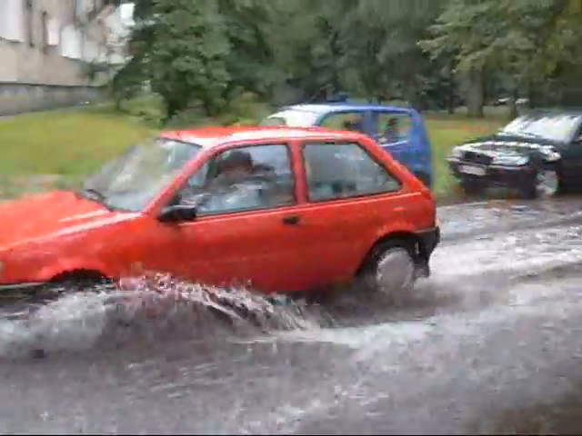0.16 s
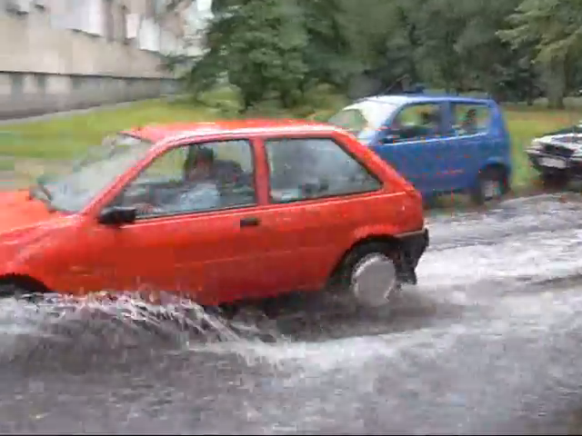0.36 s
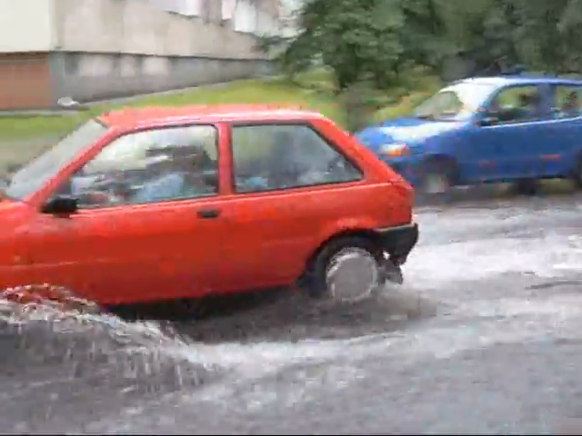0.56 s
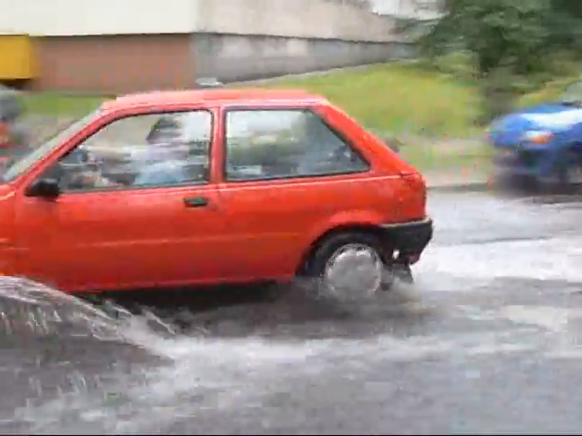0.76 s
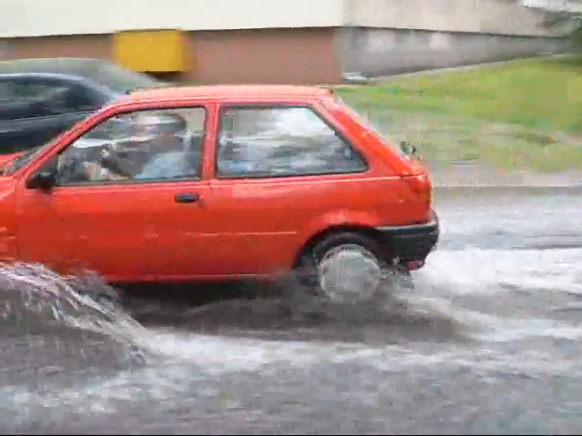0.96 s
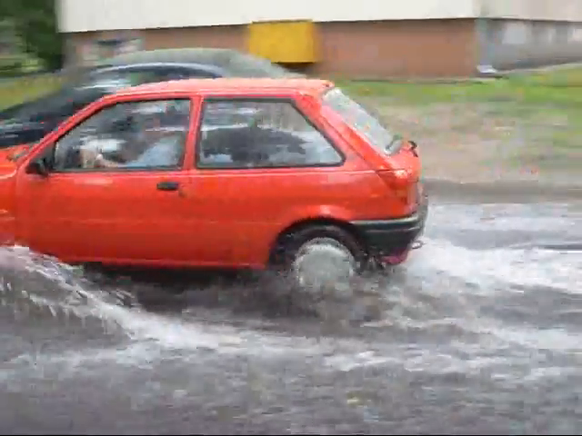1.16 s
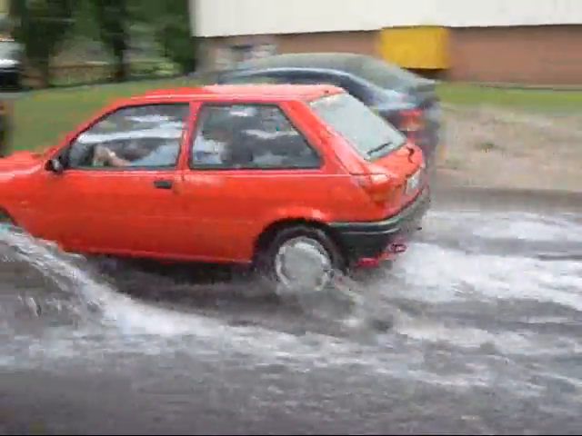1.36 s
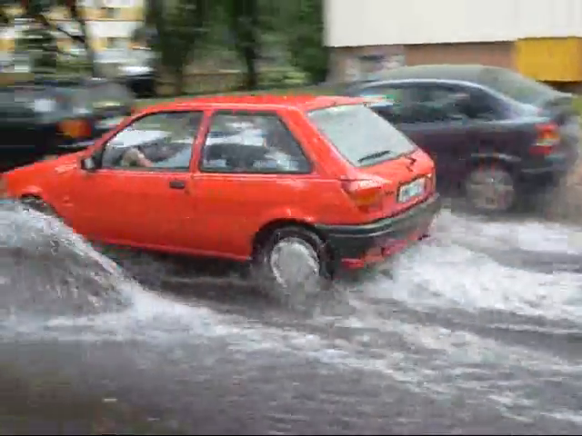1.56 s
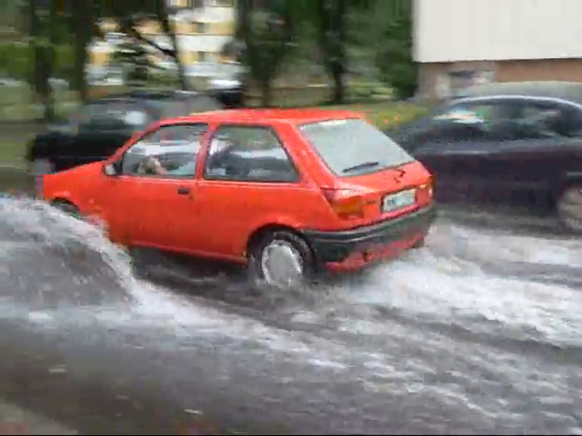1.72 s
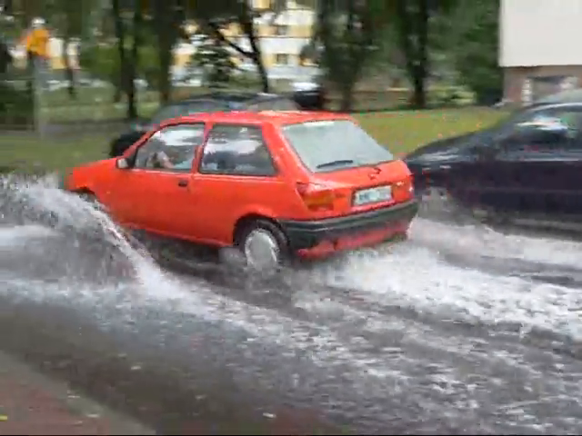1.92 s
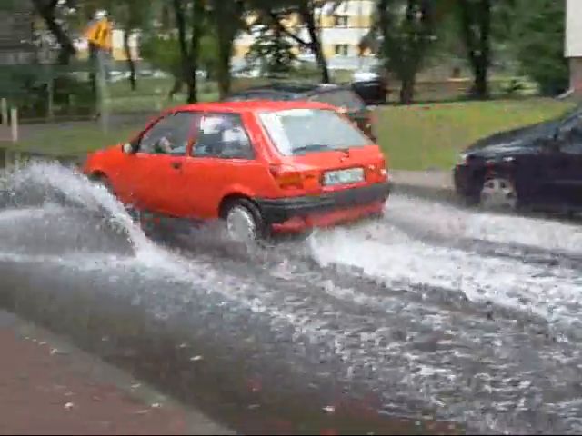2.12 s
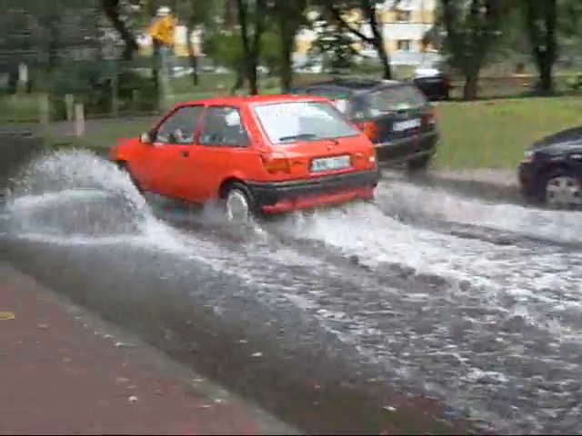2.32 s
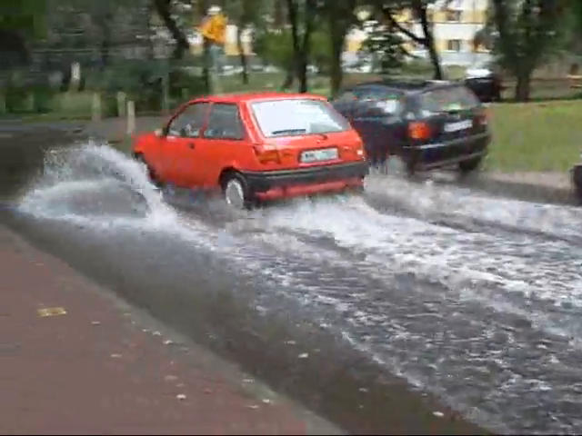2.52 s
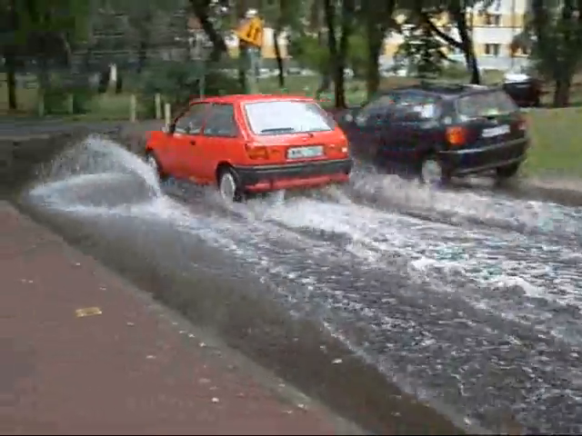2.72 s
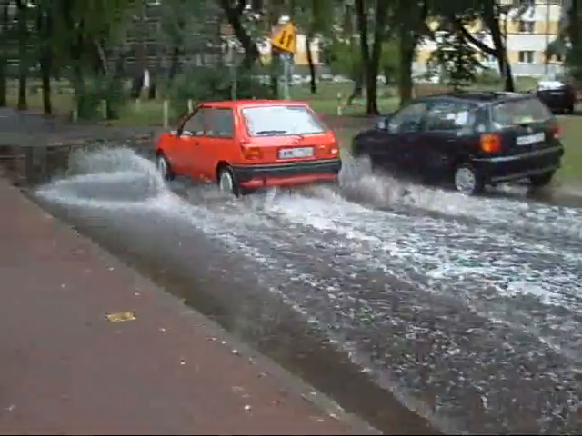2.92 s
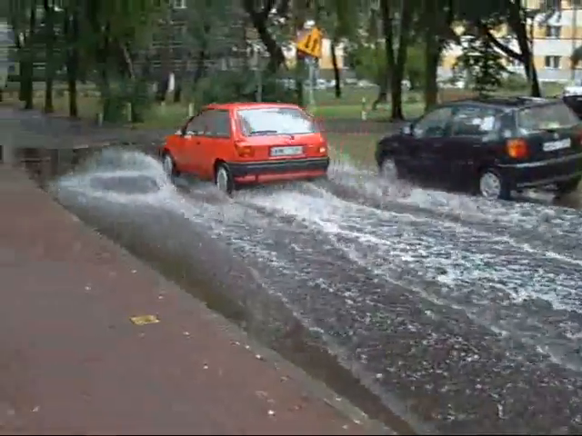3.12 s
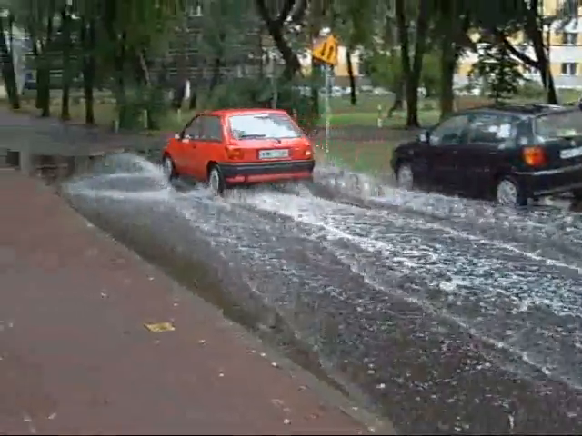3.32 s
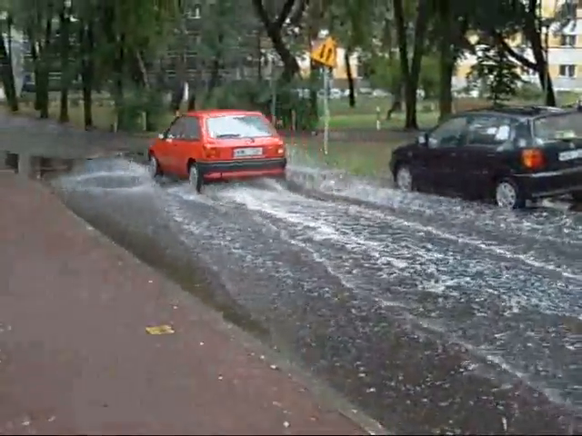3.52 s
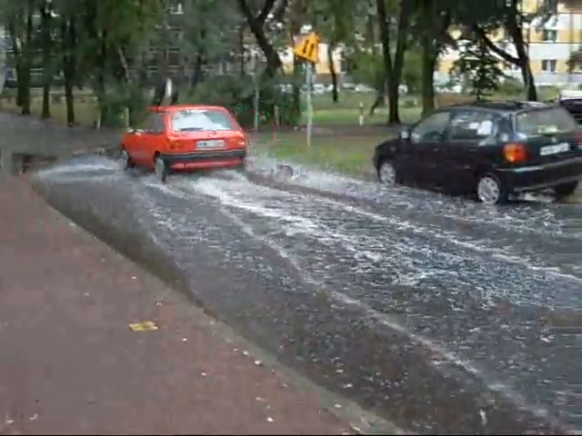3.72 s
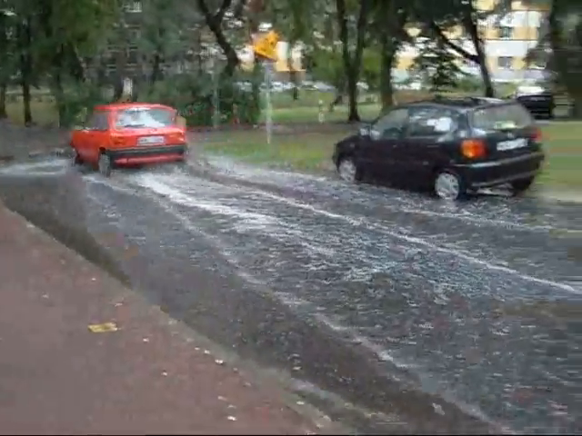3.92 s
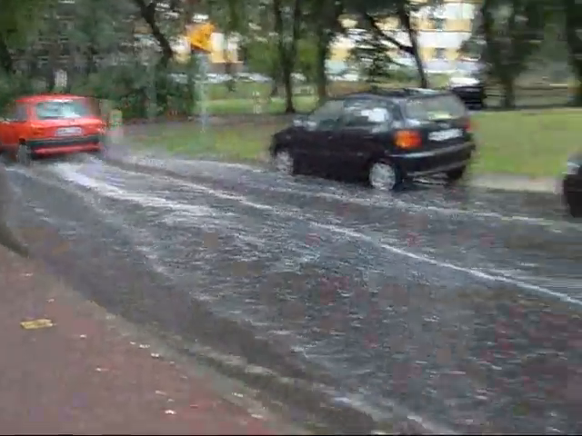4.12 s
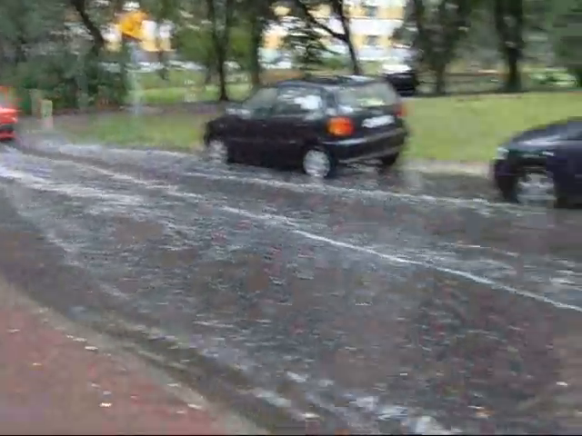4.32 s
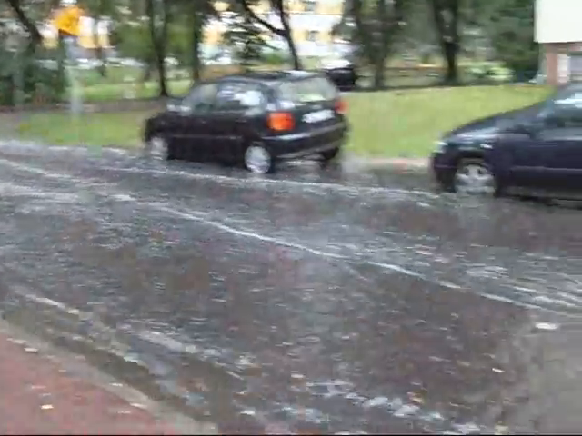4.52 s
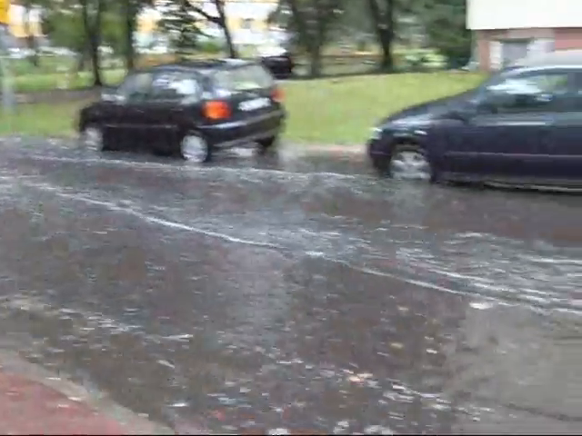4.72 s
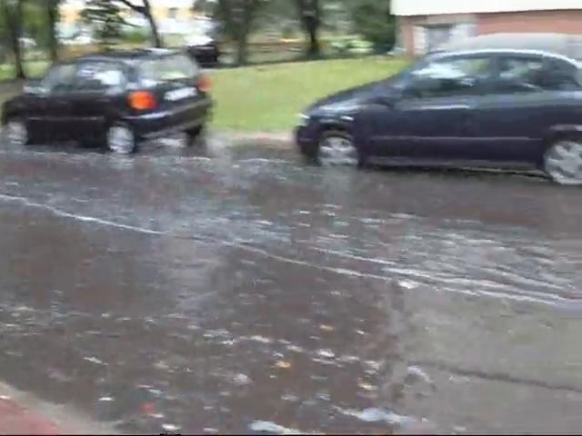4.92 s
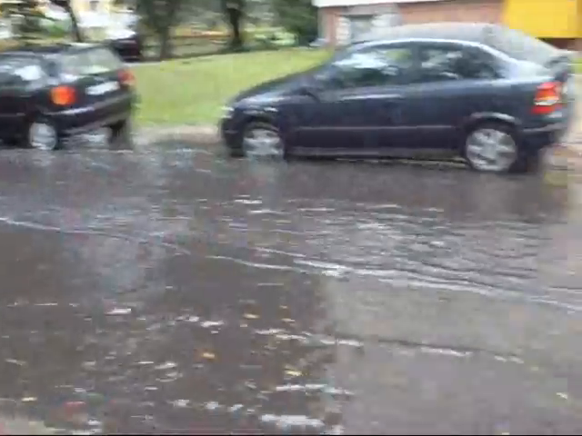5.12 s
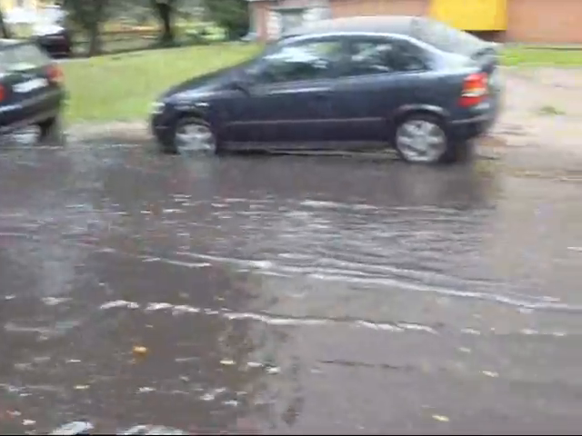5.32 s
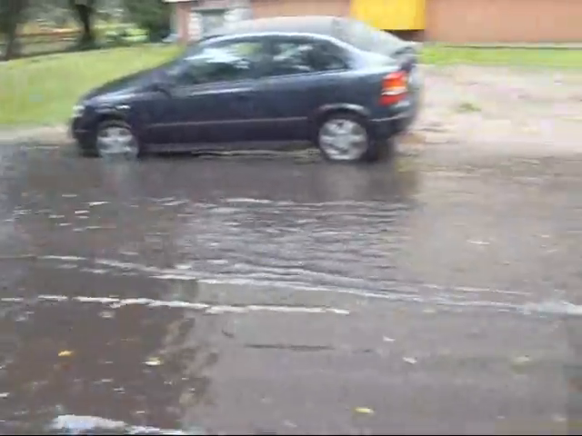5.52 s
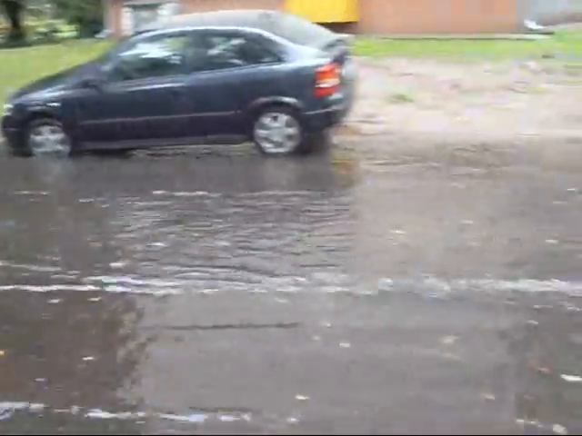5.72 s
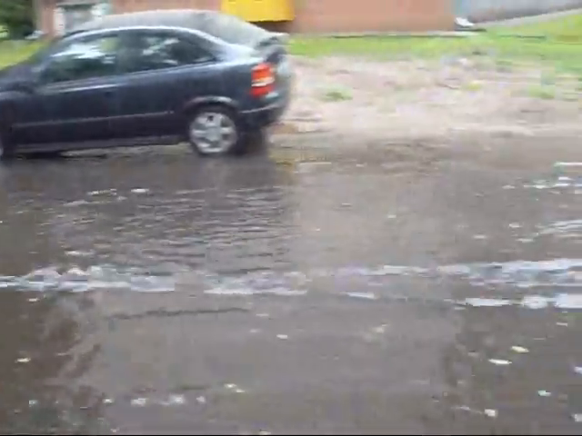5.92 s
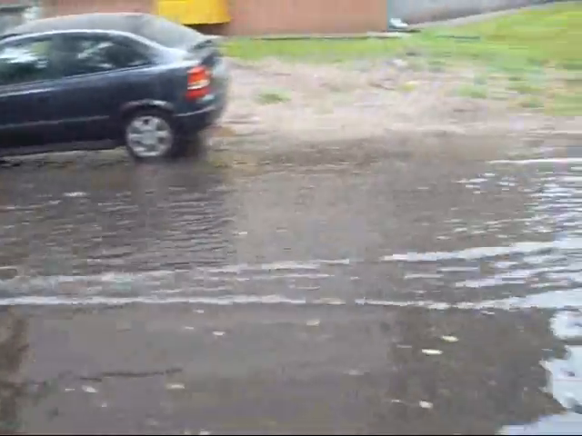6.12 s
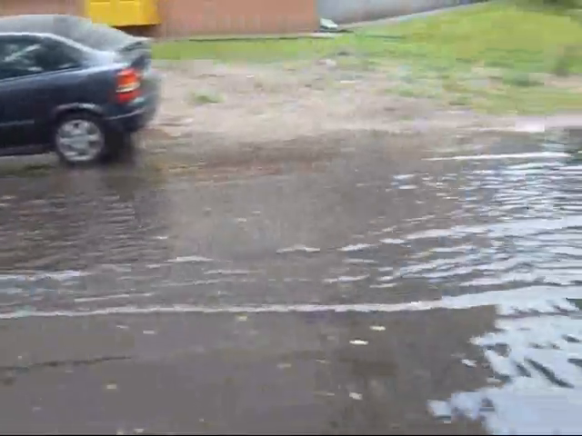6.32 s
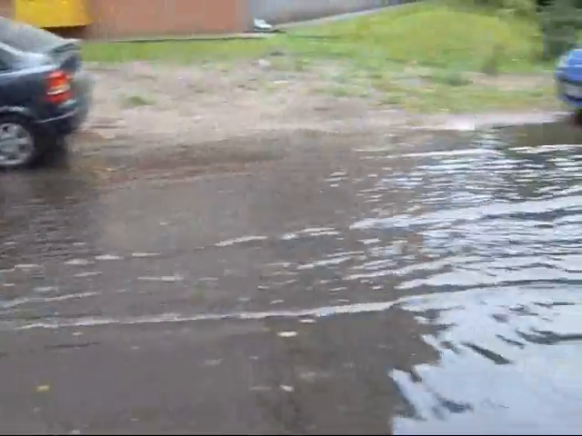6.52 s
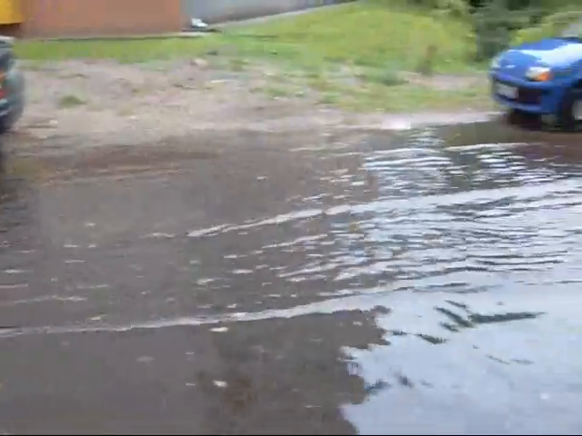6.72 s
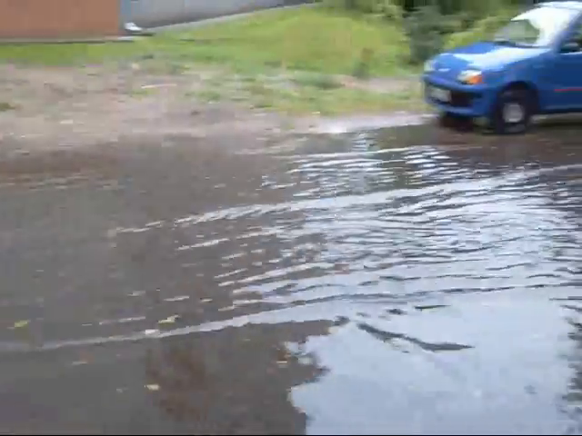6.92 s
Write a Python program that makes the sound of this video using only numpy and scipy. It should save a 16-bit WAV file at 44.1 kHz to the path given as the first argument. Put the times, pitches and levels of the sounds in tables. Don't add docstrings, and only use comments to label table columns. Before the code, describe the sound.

Outdoors beside a flooded road, water thrown by passing tyres roars and hisses in uneven sheets, spattered with bright drops. A low, slightly unsteady engine drone and soft exhaust roar swell as the tail passes, then recede. Small waves lap with fizzing swells, little slaps and bubbles, while quiet distant idling continues and one far engine rises briefly. Close, mono, cheap-microphone sound with a piercing presence peak and grainy treble.

```python
import sys
import numpy as np
from scipy import signal
from scipy.fft import rfft, irfft, next_fast_len
from scipy.io import wavfile

SR = 44100
rng = np.random.default_rng(int(sys.argv[2]) if len(sys.argv) > 2 else 0)


def transcribe(signal):
    frames = np.atleast_2d(signal).T
    limited = np.clip(frames, -1, 1)
    pcm = np.round(limited * 32767).astype(np.int16)
    wavfile.write(sys.argv[1], SR, pcm)


def gain_from_db(level_db):
    decades = np.asarray(level_db, float) / 20
    return 10 ** decades


N = 311338

WATER_EDGES_HZ = (500, 1300, 2600, 4300, 10900)
# (time [s], level [dB])
TAIL_DB = [(0, -2), (1.0, 0.5), (1.3, 3), (1.8, 4), (2.5, 2.5), (3.0, -3), (4.0, -9), (4.6, -12.5),
           (5.3, -13), (7.06, -12.5)]


def in_time(rows):
    s, *columns = np.transpose(rows)
    return [np.interp(np.arange(N) / SR, s, c) for c in columns]


def rms_one(x):
    return x / np.sqrt(np.mean(x ** 2) + 1e-20)


def coloured(x, spectrum):
    size = next_fast_len(N)
    hz, level_db = np.transpose(spectrum)
    grid_hz = np.maximum(np.arange(size // 2 + 1) * SR / size, 1)
    gain = gain_from_db(np.interp(np.log(grid_hz), np.log(hz), level_db))
    return irfft(rfft(x, size) * gain, size)[:N]


def band_pass(x, order, low_hz, high_hz):
    return signal.sosfilt(signal.butter(order, [low_hz, high_hz], "band", fs=SR, output="sos"), x)


def drift(rate_hz):
    r = np.exp(-80 * np.pi * rate_hz / SR)
    noise = rng.standard_normal(N // 40 + 2002)
    slow = signal.lfilter([1], [1, -2 * r, r * r], noise)[2000:]
    return np.interp(np.arange(N) / 40, np.arange(len(slow)), rms_one(slow))


def swell(s, half_s):
    return np.exp(-.5 * ((np.arange(N) / SR - s) / half_s) ** 2)


def impacts(per_s, spread_db):
    sizes = gain_from_db(spread_db * np.minimum(rng.exponential(1, N), 4)) * rng.choice([-1, 1], N)
    return rms_one(sizes * (rng.random(N) < per_s / SR))


def bubble(out_len, hz, ring_s, octaves, attack_s=0.0011):
    t = np.arange(out_len) / SR
    phase = 2 * np.pi * np.cumsum(hz * 2 ** (octaves * t / ring_s)) / SR
    return (1 - np.exp(-t / attack_s)) * gain_from_db(-20 * t / ring_s) * np.sin(phase)


def add(out, s, sound):
    i = round(s * SR)
    out[i:i + len(sound)] += sound[:N - i]


def water_levels():
    # (time [s], level re closest [dB])
    car_spray = [(0, 1.5), (.15, -1), (.45, -1), (.6, 1.1), (.9, -1), (1.2, -1.3), (1.35, -0.9),
                 (1.6, -2.6), (2.1, -4), (2.7, -6), (3.0, -7), (3.9, -9.5), (4.2, -12.5), (4.6, -15),
                 (5.3, -21.5), (6.2, -23), (7.06, -24)]
    # (level at closest [dB], share of spray swing [-], share of tail swing [-], level in a wave [dB])
    drop_sizes = [
        (-44, 0.52, 0.34, -3.5),
        (-36.5, 0.7, 0.25, 1),
        (-37, 1.016, 0.031, -3),
        (-42.5, 1.02, 0.011, -7),
    ]
    # (time [s], half length [s], level [dB], fizz pitch [Hz])
    wave_events = [(0.304, 0.08, -38, 4500), (.55, 0.033, -45, 1900), (0.897, 0.14, -37, 3300),
                   (1.3, 0.17, -44.5, 1900), (1.687, 0.055, -45, 4470), (2.0, .08, -44, 1794),
                   (2.701, 0.044, -48, 1500), (2.8, .2, -46.5, 750), (3.3, .1, -50.5, 750),
                   (3.55, 0.074, -50, 1703), (3.899, .12, -49.5, 1800), (4.297, 0.22, -45.5, 1440),
                   (4.4, 0.055, -50, 900), (4.807, 0.16, -45, 2030), (4.9, 0.042, -58, 900),
                   (5.02, .1, -47.5, 3030), (5.45, 0.16, -45, 2650), (5.43, .05, -52.5, 4800),
                   (5.5, 0.11, -58, 901), (5.634, .06, -54.5, 1110), (5.833, .04, -55.5, 900),
                   (5.847, 0.073, -48.5, 2820), (6.05, 0.11, -50, 2850), (6.34, 0.021, -58, 4780),
                   (6.377, 0.08, -52.5, 2800), (6.7, 0.1, -53, 3300), (7.06, 0.034, -48.5, 3020)]
    loss_db_per_oct2 = 11

    car_db, tail_db = in_time(car_spray)[0], in_time(TAIL_DB)[0]
    bells = [swell(s, half_s) for s, half_s, _, _ in wave_events]
    gains = []
    for (near_db, by_car, by_tail, wave_db), low_hz in zip(drop_sizes, WATER_EDGES_HZ):
        centre_hz = low_hz * np.sqrt(2)
        wave_power = 0
        for bell, (_, _, level_db, hz) in zip(bells, wave_events):
            off_pitch_db = loss_db_per_oct2 * np.log2(hz / centre_hz) ** 2
            wave_power = wave_power + bell * gain_from_db(2 * (level_db + wave_db - off_pitch_db))
        car_power = gain_from_db(2 * (near_db + by_car * car_db + by_tail * tail_db))
        gains.append(np.sqrt(car_power + wave_power))
    return gains


def falling_water(low_hz, high_hz, per_s, spread_db, grain_share, splats, patchy_db):
    # (frequency [Hz], density [dB per Hz])
    water_colour = [(260, -52), (450, -44), (520, -16), (720, -8.5), (1260, -8.5), (1500, -6), (2200, -4.5),
                    (2800, -2.5), (3800, -5), (4900, -13.5), (6600, -29), (9000, -31), (11000, -33),
                    (14000, -54)]
    out, together = 0, drift(3.7)
    edges_hz = np.geomspace(low_hz, high_hz, 4)
    share = np.clip(grain_share, 0, 1)
    for a, b in zip(edges_hz, edges_hz[1:]):
        grains = np.sqrt(share) * impacts(per_s, spread_db)
        hiss = np.sqrt(1 - share) * rng.standard_normal(N)
        band = band_pass(grains + hiss + splats, 2, a, b)
        out = out + band * gain_from_db(patchy_db * (0.11 * together + drift(20.0)))
    return rms_one(coloured(out, water_colour))


def water():
    churn, wash, spray, mist = water_levels()
    e = WATER_EDGES_HZ
    splat_gain = np.interp(np.arange(N) / SR, [0, 4.0, 4.7, 7.1], [0.67, 0.75, 0.65, 0.84])
    splats = impacts(260, 4.9) * splat_gain
    return (churn * falling_water(e[0], e[1], 250, 2.8, 0.41, 0.65 * splats, patchy_db=0.53)
            + wash * falling_water(e[1], e[2], 500, 3.1, 0.36, splats, patchy_db=0.73)
            + spray * falling_water(e[2], e[3], 900, 3.5, 0.096, splats, patchy_db=0.5)
            + mist * falling_water(e[3], e[4], 2500, 2.5, 0.11, 0.32 * splats, patchy_db=0.6))


def engine():
    # (time [s], firing rate [Hz], load as level of order 2 [dB])
    firing = [(0, 43.8, -58), (.35, 44.7, -55), (.75, 44, -53.5), (1.0, 45.33, -51), (1.6, 46.83, -50.5),
              (2.28, 50.4, -52.5), (2.42, 49.9, -71), (2.65, 48.7, -69), (3.0, 48.75, -59.5),
              (3.3, 48.4, -66), (3.9, 46.95, -64), (4.75, 45.5, -62), (4.98, 46.3, -67), (5.14, 47.56, -66),
              (5.75, 48.7, -59.5), (6.05, 50.54, -64.5), (6.6, 53.2, -70.5), (7.06, 52.1, -69)]
    # (time [s], half length [s], loss [dB])
    lift_offs = [
        (.25, 0.04, 14),
        (1.206, .08, 0.5),
        (3.58, 0.1, 17),
        (6.219, .08, 4),
    ]
    # (multiple of firing order [-], level re order 2 [dB])
    weak_orders = [(2.5, -18.5), (6, -21.5), (7, -21.5)]
    # (time [s], half length [s], order [-], level [dB])
    booms = [(.5, .25, 3, -63.5), (1.3, 0.37, 3, -59), (2.25, 0.087, 3, -73), (3.0, 0.11, 3, -67),
             (4.9, .15, 3, -73), (5.3, 0.11, 3, -70.5), (5.7, 0.19, 3, -76), (.7, 0.19, 4, -68),
             (1.076, 0.18, 4, -64.5), (2.1, .25, 4, -70), (3.0, 0.13, 4, -74), (5.9, 0.081, 4, -79),
             (6.205, 0.096, 4, -78), (.8, .12, 5, -67), (1.7, .15, 5, -67.5), (2.3, .12, 5, -69),
             (2.8, 0.1, 5, -78), (3.6, .1, 5, -75), (5.25, 0.13, 5, -72.5), (5.602, 0.17, 5, -72),
             (4.7, .12, 5, -74), (1.3, 1.2, 1, -71), (6.0, 0.78, 1, -71)]
    # (frequency [Hz], density [dB per Hz])
    roar_colour = [(88, -40), (150, -5), (290, 3), (471, -0.5), (520, -10), (680, -30), (1140, -120)]
    quiet_order_db, roar_db = -86, -56.5

    hz, load_db = in_time(firing)
    load_db = load_db - sum(lost_db * swell(s, half_s) for s, half_s, lost_db in lift_offs)
    turn = 2 * np.pi * np.cumsum(hz) / SR + 0.047 * drift(4.3)
    orders = [(2, gain_from_db(load_db))] + [(k, gain_from_db(load_db + under_db)) for k, under_db in weak_orders]
    for k in (1, 3, 4, 5):
        boom = sum(gain_from_db(db) * swell(s, half_s) for s, half_s, order, db in booms if round(order) == k)
        orders.append((k, gain_from_db(quiet_order_db) + boom))
    hum = 0
    for k, gain in orders:
        tone = np.sin(k * turn + rng.uniform(0, 6.6))
        hum = hum + np.sqrt(2) * gain * gain_from_db(0.66 * drift(6.9)) * tone
    roar = rms_one(coloured(rng.standard_normal(N), roar_colour)) * (1 + 0.058 * np.sin(turn))
    return hum + gain_from_db(roar_db + in_time(TAIL_DB)[0]) * roar


def street():
    # (frequency [Hz], density [dB per Hz])
    traffic_colour = [(8, -15), (18, -4), (30, -10), (40, -7), (62, 5), (80, 4), (140, -3), (200, -3.5),
                      (300, -40)]
    # (frequency [Hz], density [dB per Hz])
    gutter_colour = [(300, -43), (500, -10), (1100, -14), (2000, -13.5), (3200, 3.5), (4200, -14),
                     (5700, -30), (7000, -38), (11000, -44), (14000, -60)]
    # (frequency [Hz], width [Hz], level [dB])
    idle_lines = [
        (60.2, 3.4, -77),
        (80, 4, -73),
    ]
    # (time [s], frequency [Hz], level [dB])
    far_rev = [
        (6.47, 143, -78),
        (6.55, 145, -67),
        (6.65, 147.5, -65),
        (6.75, 152.4, -64),
        (6.86, 158.6, -66),
        (6.95, 162, -84),
        (7.06, 166, -90),
    ]
    traffic_db, gutter_db = -67.5, -56.5

    out = gain_from_db(traffic_db) * rms_one(coloured(rng.standard_normal(N), traffic_colour))
    trickle = rng.standard_normal(N) + .7 * impacts(120, 3.6)
    out += gain_from_db(gutter_db + 0.99 * drift(7.6)) * rms_one(coloured(trickle, gutter_colour))
    for hz, width_hz, level_db in idle_lines:
        line = [(hz - 3 * width_hz, -40), (hz, 0), (hz + 3 * width_hz, -40)]
        out += gain_from_db(level_db) * rms_one(coloured(rng.standard_normal(N), line))
    hz, level_db = in_time(far_rev)
    fade_in = np.clip((np.arange(N) / SR - far_rev[0][0]) / .08, 0, 1)
    return out + np.sqrt(2) * fade_in * gain_from_db(level_db) * np.sin(2 * np.pi * np.cumsum(hz) / SR)


def drops():
    # (time [s], peak [dB], pitch [Hz])
    ticks = [(0.033, -29, 3300), (0.0603, -21, 3280), (0.137, -15, 3300), (0.154, -14, 3270),
             (0.3765, -19, 3130), (0.3967, -14.5, 3330), (0.4683, -12, 2470), (0.4898, -23, 3190),
             (0.5112, -11, 3400), (0.5452, -12, 3140), (0.5666, -17, 3330), (0.5978, -14, 3230),
             (0.627, -20, 3460), (0.6702, -18, 3240), (0.84, -9.5, 3270), (0.953, -17, 3200),
             (1.2174, -18, 3230), (1.271, -21, 3150), (1.4088, -15, 3150), (1.6158, -26, 3215),
             (1.8392, -21, 3460), (2.0286, -15.5, 3240), (2.1909, -9.5, 3074)]
    # (time [s], peak [dB])
    slaps = [(4.2911, -31), (4.5334, -31), (4.6664, -32), (4.6838, -29), (4.6904, -30), (4.7964, -30),
             (4.8734, -30), (4.8904, -30), (4.9681, -28), (4.9824, -31), (5.1562, -32), (5.2064, -32),
             (5.2924, -28), (5.3374, -30), (5.3754, -32), (5.4211, -31), (5.451, -32), (5.4909, -30),
             (5.7753, -34), (5.8306, -32), (5.881, -33), (6.0197, -34), (6.0784, -35), (6.3504, -35),
             (6.3714, -34), (6.4038, -37), (6.6588, -35), (6.7037, -34), (6.7144, -36), (7.0434, -34)]
    # (time [s], peak [dB], start pitch [Hz], ring [s], rise [octaves])
    plops = [
        (0.599, -32, 1300, 0.011, 0.15),
        (1.4547, -28.5, 980, 0.011, 0.1),
        (4.55, -45, 700, 0.016, 0.16),
        (6.082, -49, 1050, 0.043, 0.77),
        (6.111, -32.5, 1480, 0.0075, .02),
        (6.15, -48, 912, .012, 0.22),
        (6.985, -56, 525, 0.036, 0.39),
        (7.014, -38.5, 1468, 0.0098, .02),
        (7.046, -40, 844, 0.0036, 0.12),
        (7.0545, -23.5, 937, 0.0021, 0.12),
    ]
    # (time [s], peak [dB])
    mist_ticks = [
        (5.3707, -58),
        (5.4211, -55),
        (6.02, -49),
        (6.137, -64),
        (6.332, -58),
        (6.983, -52),
    ]

    out, edges = np.zeros(N), np.zeros(N)
    for s, peak_db, hz in ticks:
        ring = bubble(400, 0.953 * hz, 0.003, 0.083, attack_s=0.00056)
        add(out, s - .0003, gain_from_db(peak_db - 5.5) * ring)
    for s, peak_db in slaps:
        spread, sign = rng.uniform(-1, 1, 2)
        slap = bubble(200, 2600 * 2 ** (.2 * spread), .0009, .1, attack_s=.0002)
        add(out, s + .0004, np.sign(sign) * gain_from_db(peak_db + 3.5) * slap)
    for s, peak_db, hz, ring_s, octaves in plops:
        add(out, s, gain_from_db(peak_db + 2) * bubble(int(3 * ring_s * SR), hz, ring_s, octaves))
    for s, peak_db in mist_ticks:
        add(edges, s, gain_from_db(peak_db - 2) * rng.standard_normal(130) * np.hanning(130))
    dulled = signal.sosfilt(signal.butter(5, 4600, fs=SR, output="sos"), out + 1e-18)
    return dulled + band_pass(edges + 1e-18, 3, 6200, 8200)


def presence(x):
    # (frequency [Hz], width [Hz], level [dB])
    hz, width_hz, level_db = (3265, 290, 8.2)
    r = np.exp(-np.pi * width_hz / SR)
    zeros = np.array([1, 0, -1]) * (1 - r * r) / 2
    poles = [1, -2 * r * np.cos(2 * np.pi * hz / SR), r * r]
    return x + (gain_from_db(level_db) - 1) * signal.lfilter(zeros, poles, x)


def scene():
    return (water() + engine() + street() + drops())[None]


def roll_off(x):
    return signal.sosfilt(signal.butter(12, 15920, fs=SR, output="sos"), x)


def record(dry):
    guard = signal.butter(3, 11500, fs=SR, output="sos")
    half_rate = signal.sosfilt(guard, presence(dry))[:, ::2]
    held = np.repeat(half_rate, 2, axis=1)[:, :N]
    held = signal.sosfilt(signal.ellip(12, .5, 60, 15450, fs=SR, output="sos"), held)
    return roll_off(held)


dry = scene()
out = record(dry)
transcribe(out)
```